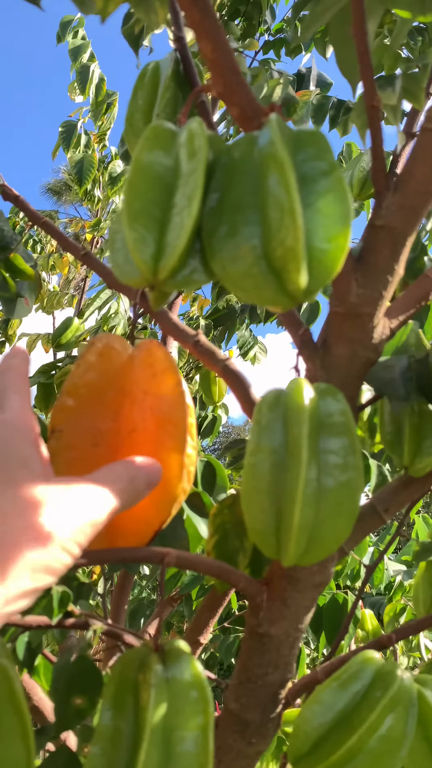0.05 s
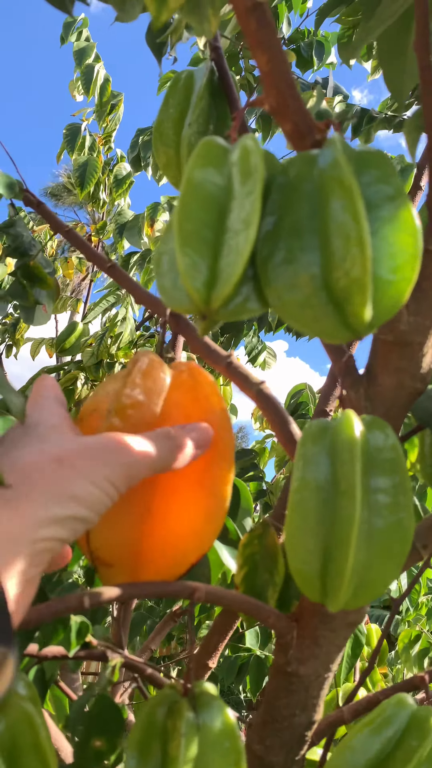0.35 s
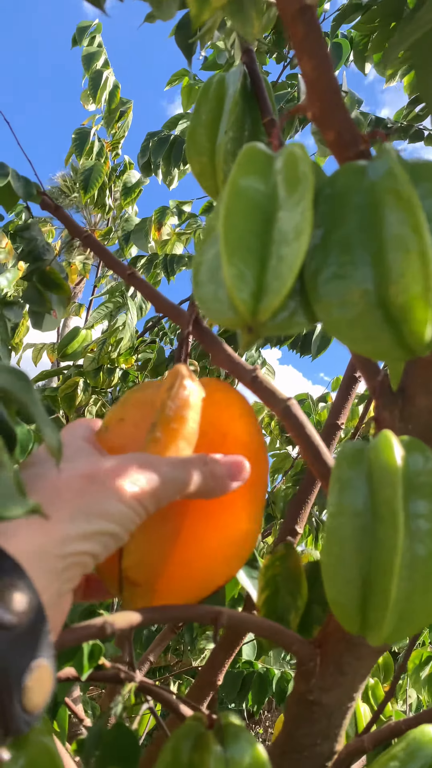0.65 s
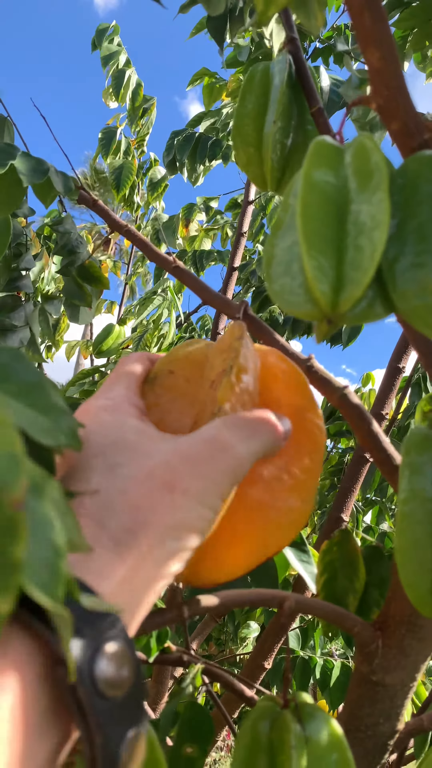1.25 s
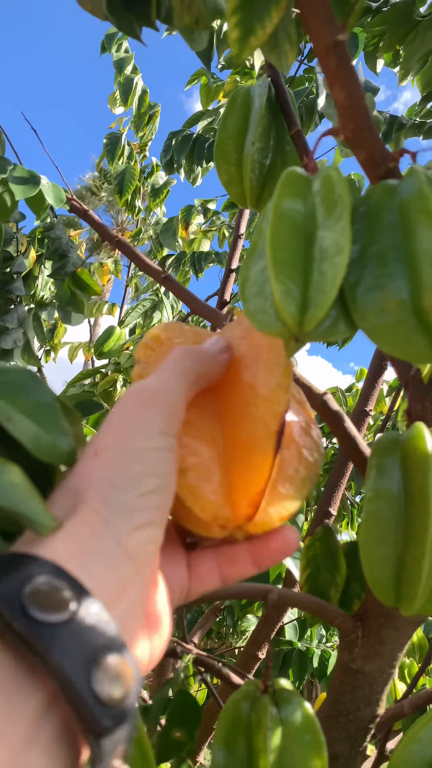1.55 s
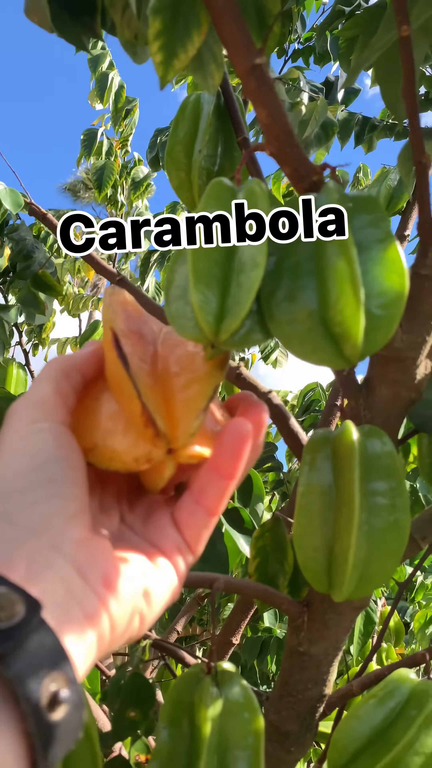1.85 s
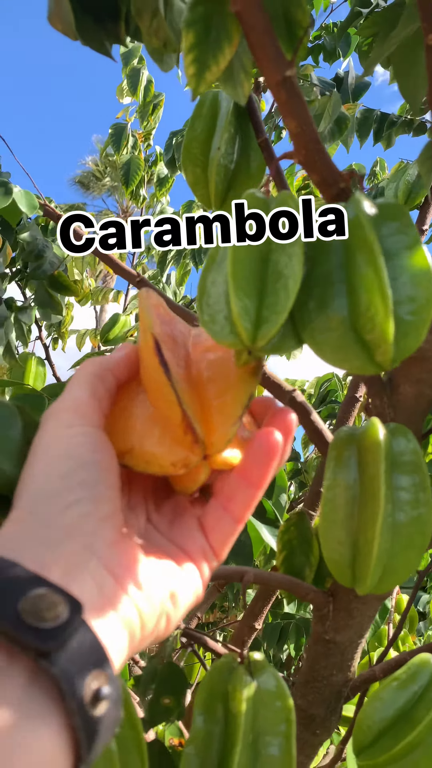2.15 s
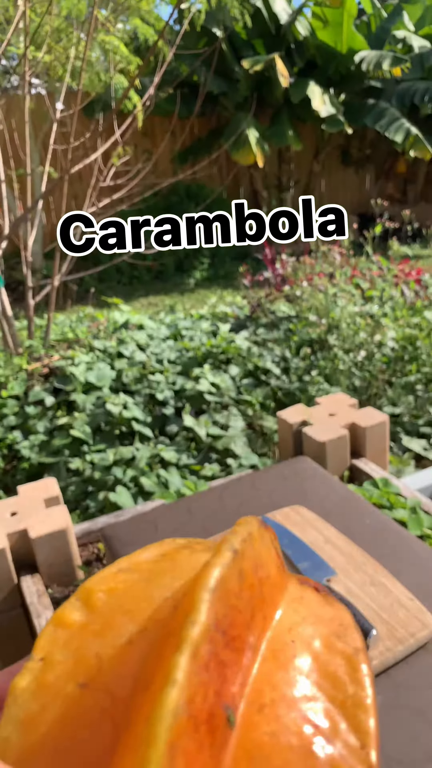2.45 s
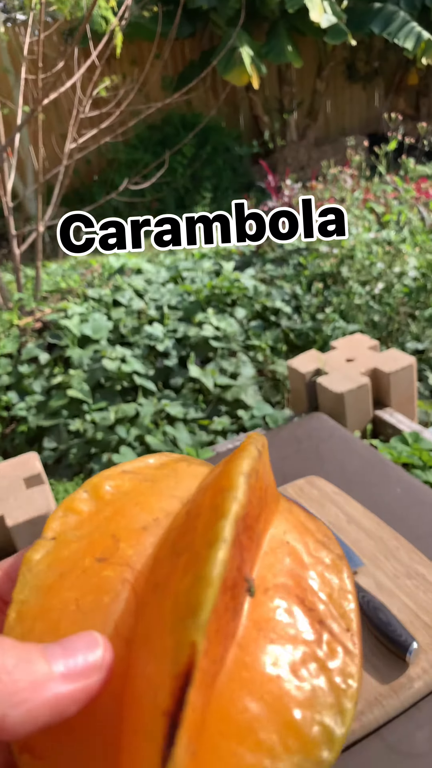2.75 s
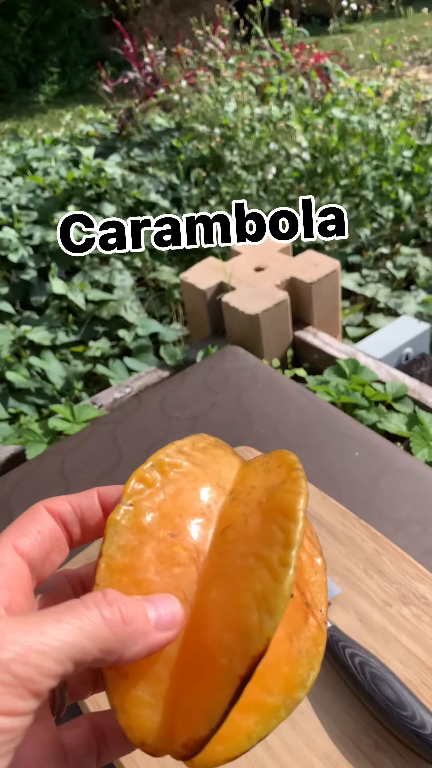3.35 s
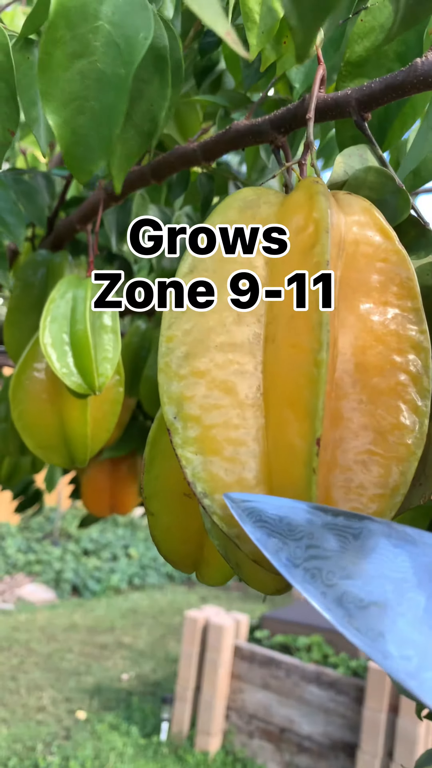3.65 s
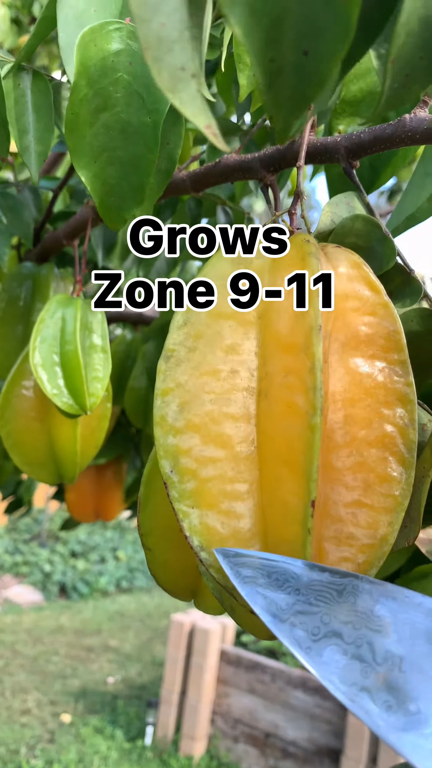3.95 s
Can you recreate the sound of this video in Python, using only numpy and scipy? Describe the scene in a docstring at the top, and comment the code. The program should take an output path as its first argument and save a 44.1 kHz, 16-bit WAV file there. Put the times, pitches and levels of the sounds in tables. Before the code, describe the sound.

Leaves rustle and tick in a soft breeze as a hand pulls a fruit, until its stalk snaps sharply. Wind gusts then buffet the close microphone over faint finger rubbing, and a small garden bird chirps faintly twice.

```python
"""A garden in light wind, heard from three spots in turn. Under a tree, in a soft breeze, a hand pulls
at a fruit: leaves brush, scrape and tick, then the stalk snaps with a crack and a short ring (2.16 s).
Cut to a table (2.34 s): gusts buffet the microphone, fingers rub and scrape the fruit, low plants stir.
Cut back to a tree (3.5 s): the gusts go on over brighter air, a far hum and two chirps of a small bird."""
import sys
import numpy as np
from scipy import signal
from scipy.fft import rfft, irfft, next_fast_len
from scipy.io import wavfile
from scipy.ndimage import uniform_filter1d, map_coordinates

SR = 44100
rng = np.random.default_rng(int(sys.argv[2]) if len(sys.argv) > 2 else 0)


def master(y):
    """Save y as 16-bit WAV."""
    cut = np.clip(np.atleast_2d(y).T, -1, 1)
    pcm = np.round(cut * 32767)  # scale
    wavfile.write(sys.argv[1], SR, pcm.astype(np.int16))


N = 176400
T = np.arange(N) / SR
TABLE_S, ORCHARD_S = 2.339, 3.503  # the two cuts
CHANNEL_LAG_S = 0.0001558  # the right channel trails the left by this fixed lag in many sounds

# The stalk's fibres giving way. Each row: start in seconds, level in dB.
FIBRE_BREAKS = [(2.1605, -19.5), (2.1613, -20.5), (2.166, -41), (2.172, -37), (2.1845, -41)]
# The ring of stalk and fruit. Each row: pitch in Hz, relative level in dB, 60 dB decay in seconds.
STALK_MODES = [(536, -15.5, 0.045), (1020, -4, 0.013), (1300, 0.5, 0.014), (1910, -4, 0.017),
               (2210, -5, 0.017), (2400, -9, 0.02), (2750, -9, 0.016), (3860, -10.5, 0.014)]
# Gusts on the microphone. Each row: time in seconds, relative rumble and flutter levels in dB.
GUST_LEVELS = [(2.345, -28.5, -45.5), (2.41, -28, -56), (2.441, -31.5, -59), (2.491, -26.5, -35.5),
               (2.6, -27.5, -49), (2.621, -41, -58), (2.671, -30, -31), (2.707, -25.5, -40),
               (2.755, -50, -68), (2.791, -42, -54), (2.841, -51, -76), (2.873, -42, -80),
               (2.887, -44.5, -56), (2.907, -41, -76), (2.919, -39.5, -59), (2.999, -42.5, -69),
               (3.035, -43, -39), (3.105, -32.5, -57), (3.113, -54, -57), (3.137, -28.5, -42.5),
               (3.165, -48, -50.5), (3.197, -31.5, -40.5), (3.243, -55.5, -68), (3.283, -36.5, -48),
               (3.343, -36, -58), (3.377, -51.5, -58.5), (3.501, -37, -56), (3.519, -42, -42),
               (3.537, -34.5, -40), (3.561, -40.5, -54), (3.601, -34.5, -39.5), (3.647, -36.5, -58),
               (3.685, -29.5, -41.5), (3.717, -43.5, -51), (3.739, -35, -65), (3.773, -55, -71),
               (3.787, -37, -43), (3.813, -44, -57), (3.837, -39.5, -60), (3.925, -43, -86),
               (4.0, -53, -75)]
# Single thumps of wind. Each row: time in seconds, peak in dB before the low cut, half width in seconds.
WIND_THUMPS = [(2.344, -28, 0.0035), (2.49, -16, 0.0014), (2.59, -12, 0.0026), (2.669, -26, 0.0011),
               (3.032, -24, 0.0011), (3.138, -28, .0015), (3.195, -16.5, 0.0014), (3.598, -26.5, 0.00063),
               (3.785, -23.5, 0.0016), (3.839, -22.5, 0.0025)]
# Short ticks of leaves and twigs, and fingers scraping the fruit's skin at the table.
# Each row: start in seconds, level in dB, centre in Hz, 60 dB decay in seconds.
TICKS_AND_SCRAPES = [(0.075, -50, 1140, 0.38), (.153, -57, 8000, 0.025), (.538, -54, 2100, 0.21),
                     (0.55, -48, 5460, 0.036), (.563, -47, 6500, 0.02), (0.601, -44, 6130, 0.038),
                     (.648, -45, 4500, .02), (0.778, -43.5, 2500, 0.034), (1.163, -48, 9000, 0.011),
                     (1.18, -42, 8000, .012), (1.203, -36, 6400, 0.014), (1.2125, -39, 6000, 0.014),
                     (1.231, -48, 3500, 0.028), (1.3125, -49, 4400, .014), (1.328, -35.5, 6100, 0.022),
                     (1.338, -40, 2870, 0.013), (1.355, -37, 6500, 0.012), (1.722, -55, 6000, 0.044),
                     (1.737, -45.5, 4230, 0.018), (2.012, -47.5, 5860, 0.025), (2.582, -48, 11200, 0.01),
                     (2.68, -63, 13000, 0.29), (2.79, -58.5, 11000, 0.032), (3.06, -59, 12000, .1),
                     (3.15, -44.5, 1960, 0.016), (3.503, -54, 2300, 0.023)]
# Crisp scrapes of single leaves. Each row: start in seconds, level in dB, 60 dB decay in seconds.
LEAF_SCRAPES = [(.25, -67, 0.95), (1.2, -50, 0.21), (1.315, -60, 0.18), (2.19, -51, 0.46)]
# Bird notes. Each row: start and length in seconds, first and last pitch in Hz, level in dB.
BIRD_NOTES = [(3.643, 0.0089, 5680, 5420, -55), (3.657, 0.029, 4150, 3600, -55)]
# The tones of a far hum. Each row: pitch in Hz, level in dB.
HUM_TONES = [(645, -65.5), (1055, -68.5)]

# Fader moves. Each row: time in seconds, relative level in dB.
BRUSH_FADER = [(0, -60), (.13, -58), (.17, -54), (.24, -57.5), (.33, -54.5), (.43, -59), (.53, -58),
               (.55, -52.5), (.61, -54), (.63, -55.5), (.73, -60), (.78, -57), (.95, -64), (1.1, -64.5),
               (1.18, -60.5), (1.22, -45.5), (1.28, -62), (1.33, -52.5), (1.4, -61.5), (1.55, -62),
               (1.7, -67), (1.74, -61.5), (1.8, -68), (2, -62), (2.08, -65), (2.155, -55), (2.18, -48.5),
               (2.26, -55.5), (2.31, -52.5), (2.34, -52.5)]  # leaves brushed by the arm and the swinging twig
FINGER_FADER = [(2.34, -62.5), (2.39, -65), (2.43, -56.5), (2.54, -57.5), (2.58, -68.5), (2.68, -66),
                (2.74, -72.5), (2.89, -70.5), (2.93, -69), (3.01, -72), (3.07, -64.5), (3.11, -67),
                (3.22, -73), (3.35, -67.5), (3.5, -75)]  # fingers sliding on waxy skin
PLANT_FADER = [(2.88, -88), (2.93, -72.5), (3.15, -67.5), (3.3, -69), (3.5, -73.5)]  # dry ground plants by the table
BREEZE_FADER = [(0, -57), (.11, -60.5), (.16, -58.5), (.6, -63.5), (.75, -66), (.79, -55.5), (1.04, -56.5),
                (1.08, -62.5), (1.12, -57), (1.6, -56.5), (2.15, -56.5), (2.22, -63.5), (2.34, -53.5)]  # breeze in the surrounding trees
HOLLOW_FADER = [(0, -64), (.4, -67), (.65, -66), (.8, -70)]  # a hollow rush of air that eases off
SOFT_RUMBLE_FADER = [(0.0, -64), (0.02, -46.5), (0.59, -47), (0.63, -57), (0.66, -42.5), (0.72, -58),
                     (0.75, -44.5), (0.98, -53), (1.0, -48), (1.27, -47.5), (1.28, -54), (1.38, -41),
                     (1.47, -46), (1.48, -54.5), (1.59, -42.5), (1.7, -49.5), (1.72, -45.5), (2.2, -46.5),
                     (2.27, -52), (2.32, -49.5)]  # wind rumble under the tree

# Tone colours. Each row: frequency in Hz, relative level in dB.
CRACK_EQ = [(300, -0.5), (1300, -3), (2500, 0.5), (3200, 1), (3800, 6), (4500, -3), (6500, 5), (8500, 4.5),
            (11000, 0.5), (12700, 6.5), (14500, 6.5)]
GUST_RUMBLE_EQ = [(20, -10), (40, -1.5), (62, 5), (112, -0.5), (160, -9), (230, -23.5), (400, -66),
                  (900, -87)]
FLUTTER_EQ = [(80, -28), (170, 7), (240, 1), (340, -6.5), (480, -17), (700, -33), (1200, -51), (3000, -83)]
LEAF_EQ = [(300, -42), (1200, -5), (3000, -2), (4300, 0.5), (5200, -5.5), (6300, 3), (7400, 1), (8300, 0.5),
           (9700, -2.5), (12800, -6), (14300, -5)]
SCRAPE_EQ = [(2000, -12), (3100, -30), (4400, -14), (5200, -20), (9000, 13), (11000, 25), (13200, 21),
             (14500, 6)]
SLIDE_EQ = [(2000, -13), (4800, -11), (5900, 7), (6900, -4), (8500, -17), (14000, -36)]  # the narrow hiss of a leaf along the arm
SKIN_EQ = [(400, -15), (1100, 0.5), (1500, 2.5), (2300, 4), (3000, -1), (4100, 3), (5000, -6.5),
           (6500, -4.5), (8500, -9), (13000, -7.5), (14500, -7.5)]
PLANT_EQ = [(900, -36), (1300, 5), (1800, 0.5), (2300, 5.5), (2800, -16), (5000, -48)]
BREEZE_EQ = [(60, -6), (200, 3), (400, -1.5), (700, -1.5), (1250, -5), (2000, -7.5), (2900, -17.5),
             (4200, -11), (8000, -23), (14000, -99)]
FLAP_EQ = [(150, 0), (400, 4.5), (1500, -6), (2400, -13), (5000, -45)]  # leaves flapping softly
HOLLOW_EQ = [(150, -20), (330, 1), (650, -1.5), (1100, -4.5), (1700, -19), (4000, -37)]
SOFT_RUMBLE_EQ = [(20, -36), (40, -11.5), (58, 2), (85, -4), (128, -2), (170, -23), (230, -25), (450, -37),
                  (1000, -72)]
TABLE_AIR_EQ = [(60, 4), (300, -6.5), (650, 4.5), (1000, -4), (1700, -5), (2800, -21.5), (4000, -15),
                (7000, -18), (9000, -28.5), (13000, -25)]
ORCHARD_AIR_EQ = [(60, 7), (450, 2.5), (750, -4.5), (1200, -2.5), (2500, -12.5), (4000, -11.5), (6000, -14),
                  (8000, -17), (9700, -15), (11500, -26), (13500, -21.5), (14300, -35)]
MICROPHONE_EQ = [(20, 0), (38, 1.5), (64, 0.5), (13400, 0), (14400, -14), (15000, -32)]

# Stereo images. Each row: frequency in Hz, left-right likeness from -1 (opposed) to 1 (mono).
CRACK_IMAGE = [(500, 0.55), (1300, 0.33), (3000, 0.21), (6500, 1), (9500, 0.7), (13000, 0.63)]
FOLIAGE_IMAGE = [(500, 1), (2000, 0.031), (4000, 0.21), (6500, 0.66), (9500, 1), (12500, 0.74)]
BREEZE_IMAGE = [(60, 0.6), (200, 0.62), (450, 0.08), (1230, 0.72), (2260, 0.18), (4130, -0.62),
                (7500, -0.1)]
WIDE_FLUTTER_IMAGE = [(150, -0.95), (280, 0.3), (400, 0.99)]
PLANT_IMAGE = [(1300, -0.37), (2100, 0.55)]
SOFT_RUMBLE_IMAGE = [(25, 1.0), (60, 0.84), (120, 0.69), (200, 0.28)]
TABLE_AIR_IMAGE = [(400, 1.0), (700, 1.0), (1300, -1.0), (3000, 0.097), (6500, 0.91)]
ORCHARD_AIR_IMAGE = [(150, 0.15), (450, 0.51), (1300, 0.62), (2500, 0.06), (6000, 0.064)]


def stalk_snap(ring_db=-17.5, scatter_db=-31.5, right_lag_s=.00003, pan_db=0.2):
    """The stalk breaks: a crack for each fibre bundle, a damped ring, and a scatter from the foliage."""
    start = FIBRE_BREAKS[0][0]
    breaks = sum(amp(db) * burst(s, t60=0.013) for s, db in FIBRE_BREAKS)
    crack = rush(CRACK_EQ, CRACK_IMAGE, CHANNEL_LAG_S) * breaks
    age = T - start - np.array([[0], [right_lag_s]])
    ring = sum((-1) ** k * amp(db) * burst(start, t60, attack_s=0.00028) * np.sin(2 * np.pi * hz * age)
               for k, (hz, db, t60) in enumerate(STALK_MODES))
    scatter = rush(CRACK_EQ, FOLIAGE_IMAGE, CHANNEL_LAG_S) * burst(start, t60=0.15, attack_s=0.00081)
    return amp([[-pan_db], [pan_db]]) * (crack + amp(ring_db) * ring + amp(scatter_db) * scatter)


def gusts(rumble_trim_db=0.5, low_cut_hz=44.7):
    """Wind hits the microphone: deep rumble, flutter and single thumps, all ringing in its low cut."""
    rumble_db, flutter_db = curves(GUST_LEVELS)
    rumble = amp(rumble_db + rumble_trim_db) * eddies(GUST_RUMBLE_EQ, image=[(100, 1)], even_s=.016)
    centred = eddies(FLUTTER_EQ, image=[(200, 1)], even_s=.01)
    wide = eddies(FLUTTER_EQ, WIDE_FLUTTER_IMAGE, even_s=0.0068)
    flutter = amp(flutter_db) * np.where(T < ORCHARD_S, centred, wide)
    thumps = sum(amp(db) * np.exp(-((T - s) / width_s) ** 2) for s, db, width_s in WIND_THUMPS)
    low_cut = signal.butter(4, low_cut_hz, "highpass", fs=SR, output="sos")
    return signal.sosfilt(low_cut, rumble + flutter + thumps)


def ticks_and_scrapes(width_octaves=0.65):
    """Leaves and twigs tick, fingers scrape the fruit: noise bursts, each with its own brightness."""
    noise, out = rush([(1000, 0)], FOLIAGE_IMAGE, CHANNEL_LAG_S), np.zeros((2, N))
    for s, db, hz, t60 in TICKS_AND_SCRAPES:
        band = lambda f: np.exp(-(np.log2((f + 1) / hz) / width_octaves) ** 2 / 2)
        out += amp(db) * burst(s, t60) * unit(filtered(noise, band))
    return out


def leaf_brush(catch_db=-5, hiss_db=-0.5, flicker_db=0.5):
    """Leaves slide over each other: hiss with tiny catches in it."""
    catches = amp(catch_db) * stereo(grains(per_s=300), LEAF_EQ, FOLIAGE_IMAGE, CHANNEL_LAG_S)
    hiss = amp(hiss_db) * rush(LEAF_EQ, FOLIAGE_IMAGE, CHANNEL_LAG_S)
    return (hiss + catches) * fader(BRUSH_FADER) * amp(flicker_db * wobble(70))


def leaf_scrapes(wander=.02, slide_db=-41.5):
    """Dry leaves drag across the wrist: quick bright swells and a narrow slide whose pitch wanders."""
    position = np.cumsum(1 + wander * wobble(35))  # an uneven drag bends the pitch
    band = rush(SLIDE_EQ, FOLIAGE_IMAGE, CHANNEL_LAG_S)
    hiss = np.array([map_coordinates(channel, [position], mode="wrap") for channel in band])
    slide = amp(slide_db) * burst(.548, t60=0.31, attack_s=0.022) * hiss
    swells = sum(amp(db) * burst(s, t60, attack_s=0.0075) for s, db, t60 in LEAF_SCRAPES)
    return slide + swells * rush(SCRAPE_EQ, FOLIAGE_IMAGE, CHANNEL_LAG_S)


def finger_rub(rough_db=1.0):
    """Fingers slide over the fruit's waxy skin with a slightly rough hiss."""
    return fader(FINGER_FADER) * amp(rough_db * wobble(90)) * rush(SKIN_EQ, FOLIAGE_IMAGE, CHANNEL_LAG_S)


def bird(echo_db=2):
    """Two short falling notes and their echo among the trees."""
    song = np.zeros(N)
    for s, length, start_hz, end_hz, db in BIRD_NOTES:
        progress = np.clip((T - s) / length, 0, 1)
        hz = start_hz + (end_hz - start_hz) * progress
        song += amp(db) * np.sin(np.pi * progress) * np.sin(2 * np.pi * np.cumsum(hz) / SR)
    tail = rng.standard_normal((2, N)) * burst(0, t60=.3, attack_s=.02)
    echo = signal.fftconvolve(song[None], tail / np.linalg.norm(tail[0]), axes=1)[:, :N]
    return song + amp(echo_db) * echo


def sheltered_wind(breeze_trim_db=1, flap_db=-8):
    """Breeze and leaf flaps in the trees, a wide hollow rush, and a soft rumble at the microphone."""
    flaps = amp(flap_db) * stereo(grains(per_s=90), FLAP_EQ, BREEZE_IMAGE)
    air = rush(BREEZE_EQ, BREEZE_IMAGE, patchy_db=3)
    breeze = amp(breeze_trim_db) * fader(BREEZE_FADER) * (air + flaps)
    hollow = fader(HOLLOW_FADER) * rush(HOLLOW_EQ, image=[(600, -0.86)])
    rumble = fader(SOFT_RUMBLE_FADER) * eddies(SOFT_RUMBLE_EQ, SOFT_RUMBLE_IMAGE, even_s=0.038)
    return breeze + hollow + rumble


def table_ambience(air_db=-64):
    """The air of a quiet corner, where low plants stir with a dry rustle."""
    plants = fader(PLANT_FADER) * rush(PLANT_EQ, PLANT_IMAGE)
    return plants + amp(air_db) * rush(TABLE_AIR_EQ, TABLE_AIR_IMAGE, CHANNEL_LAG_S)


def orchard_ambience(air_db=-54, waver_rad=0.7, swell_db=3):
    """Open garden air with a faint wavering hum far away."""
    hum = np.zeros(N)
    for hz, db in HUM_TONES:
        peak = np.sqrt(2) * amp(db + swell_db * wobble(11))
        hum += peak * np.sin(2 * np.pi * hz * T + waver_rad * wobble(21.8))
    return hum + amp(air_db) * rush(ORCHARD_AIR_EQ, ORCHARD_AIR_IMAGE, patchy_db=0.9)


def rush(eq, image, lag_s=0, patchy_db=2.5):
    """Coloured stereo noise with patches of level that shift in time and frequency."""
    spectra = signal.stft(rng.standard_normal((2, N)), nperseg=512)[2]
    patches = uniform_filter1d(rng.standard_normal(spectra.shape[1:]), size=3, axis=0)
    patches = uniform_filter1d(patches, size=12, axis=1)
    noise = signal.istft(spectra * amp(patchy_db * unit(patches)), nperseg=512)[1][:, :N]
    return stereo(noise, eq, image, lag_s)


def eddies(eq, image, even_s):
    """Low turbulence with its own slow swells evened out, so that the gust sets its strength."""
    noise = stereo(rng.standard_normal((2, N)), eq, image)
    window = np.exp(-((T - T[N // 2]) / even_s) ** 2)
    power = signal.fftconvolve(np.mean(noise ** 2, axis=0), window, "same")
    return unit(noise / np.sqrt(np.abs(power)))


def grains(per_s):
    """Two unrelated streams of random clicks."""
    return (rng.random((2, N)) < per_s / SR) * rng.standard_normal((2, N))


def stereo(pair, eq, image, lag_s=0):
    """Colour two unrelated signals and mix them as mid and side; the mono mix has rms 1."""
    def response(hz):
        angle = np.arccos(np.clip(along(image, hz), -1, 1)) / 2
        return amp(along(eq, hz)) * [np.cos(angle), np.sin(angle)]
    mid, side = filtered(pair, response)
    channels = np.array([mid + side, mid - side])
    if lag_s:
        channels = filtered(channels, lambda hz: np.exp(1j * np.pi * lag_s * np.outer([1, -1], hz)))
    return channels / np.std(channels.mean(axis=0))


def filtered(x, response):
    """Shape x with a response given as a function of Hz."""
    size = next_fast_len(N + 8192)
    return irfft(rfft(x, size) * response(np.fft.rfftfreq(size, 1 / SR)), size)[..., :N]


def burst(s, t60, attack_s=0.00059):
    """A quick attack at time s, with a decay of 60 dB every t60 seconds."""
    age = np.maximum(T - s, 0)
    return (1 - np.exp(-age / attack_s)) * amp(-60 * age / t60)


def gate(start, end):
    """Open between two times, with click-free edges."""
    return uniform_filter1d(1.0 * ((T >= start) & (T < end)), size=64)


def wobble(rate):
    """A smooth random curve, rate knots a second."""
    return map_coordinates(rng.standard_normal(2048), [T * rate], mode="wrap")


def fader(moves):
    """Fader moves as a gain for every sample."""
    return amp(curves(moves)[0])


def curves(rows):
    """One value per sample for each column after the time."""
    times, *columns = np.transpose(rows)
    return [np.interp(T, times, column) for column in columns]


def along(points, hz):
    """Read an EQ or image curve on a log frequency axis."""
    freqs, values = np.transpose(points)
    return np.interp(np.log(hz + 1), np.log(freqs + 1), values)


def amp(db):
    """Decibels to gain."""
    return 10 ** (np.asarray(db) / 20)


def unit(x):
    """Scale to rms 1."""
    return x / np.sqrt(np.mean(x ** 2) + 1e-20)


def scene():
    """Tree, table and tree again, joined by hard cuts; the gusts span the last two."""
    end = N / SR
    picking = gate(0, TABLE_S) * (leaf_brush() + leaf_scrapes() + sheltered_wind() + stalk_snap())
    wind = gate(TABLE_S, end) * gusts()
    table = gate(TABLE_S, ORCHARD_S) * (finger_rub() + table_ambience())
    orchard = gate(ORCHARD_S, end) * (orchard_ambience() + bird())
    return picking + wind + table + orchard + ticks_and_scrapes()


def record(dry):
    """The microphone's slight bass lift and treble roll-off, with nothing above 15.7 kHz."""
    return filtered(dry, lambda hz: amp(along(MICROPHONE_EQ, hz)) * (hz < 15700))


dry = scene()
out = record(dry)
master(out)
```